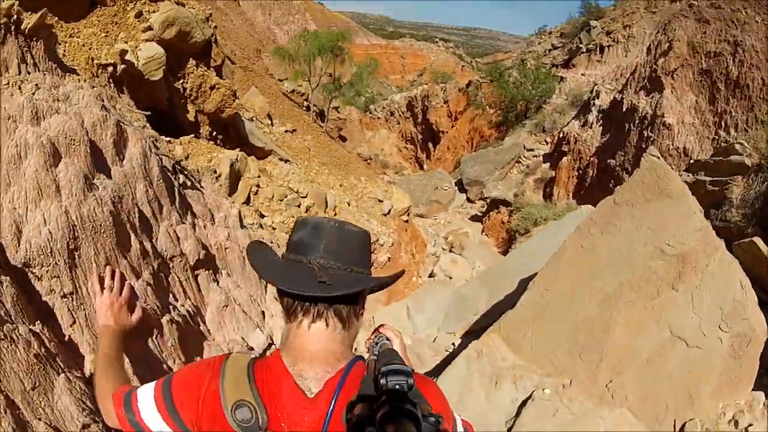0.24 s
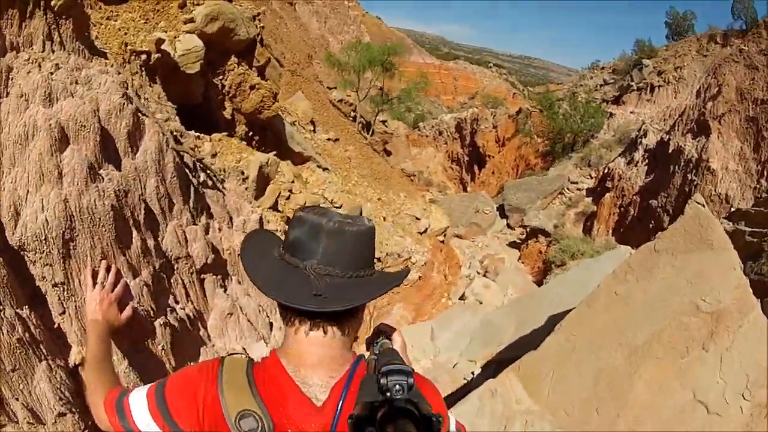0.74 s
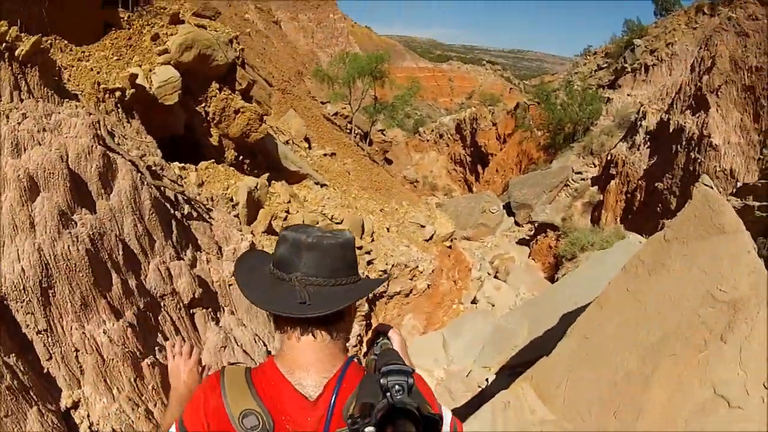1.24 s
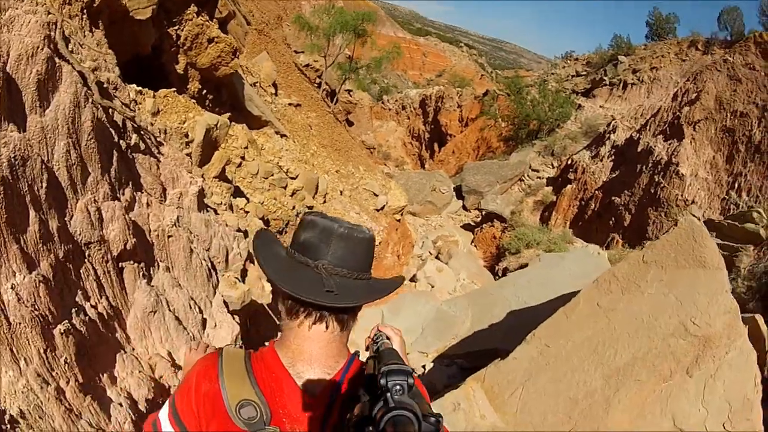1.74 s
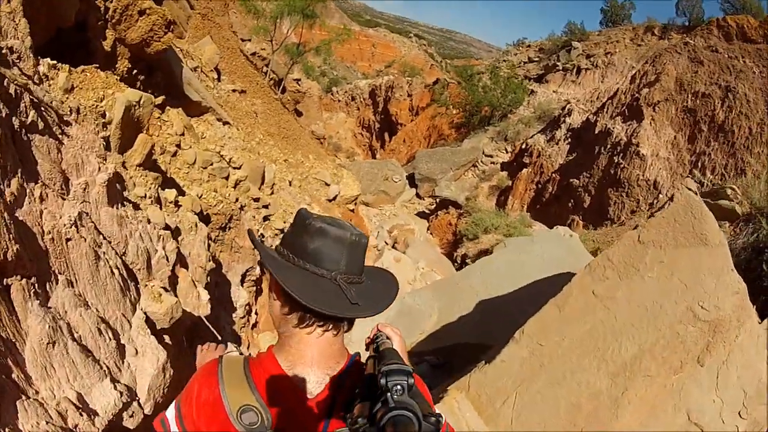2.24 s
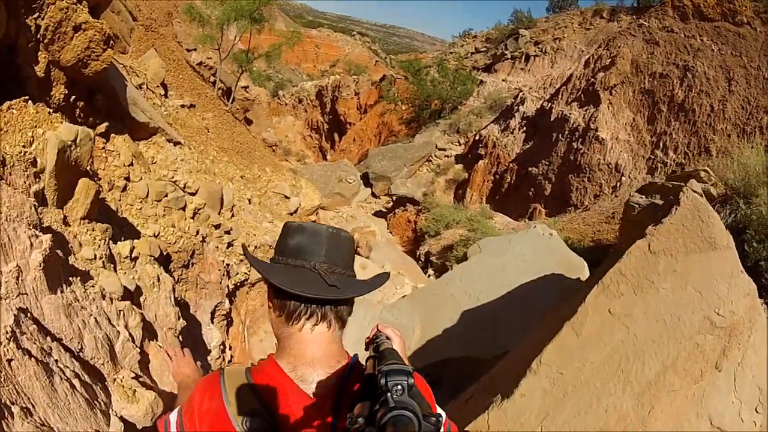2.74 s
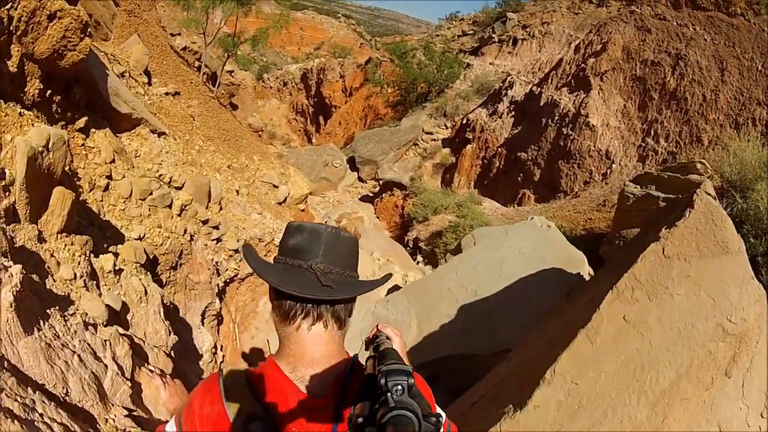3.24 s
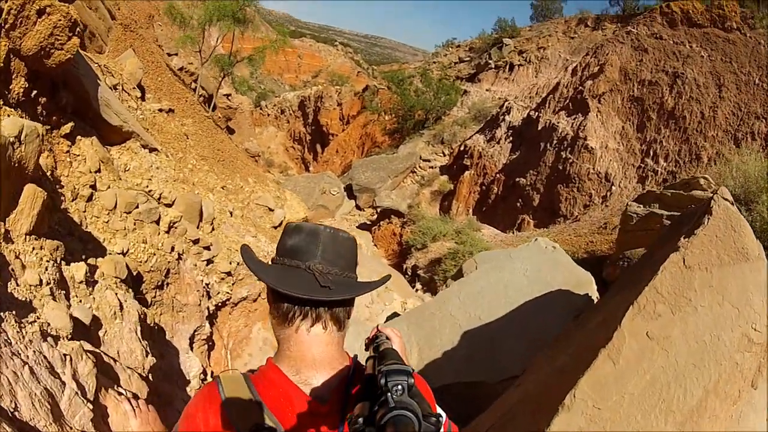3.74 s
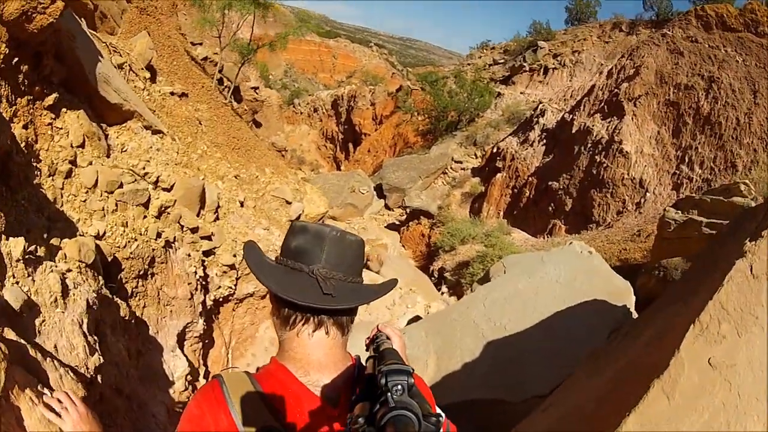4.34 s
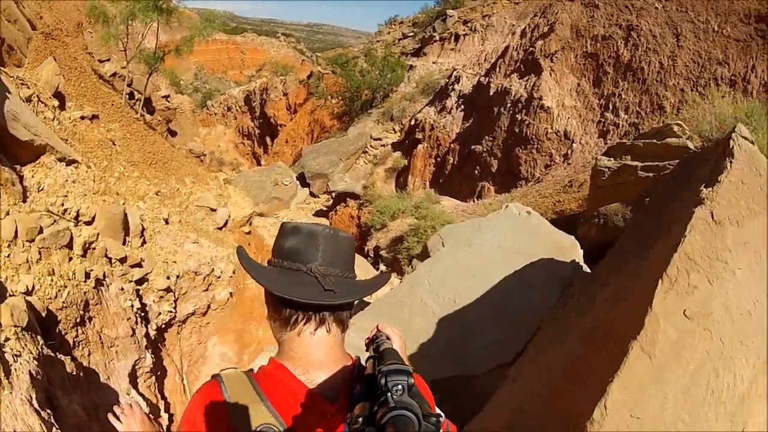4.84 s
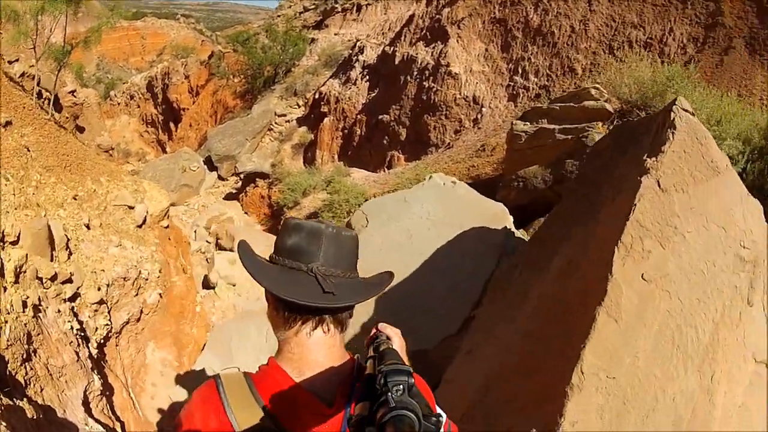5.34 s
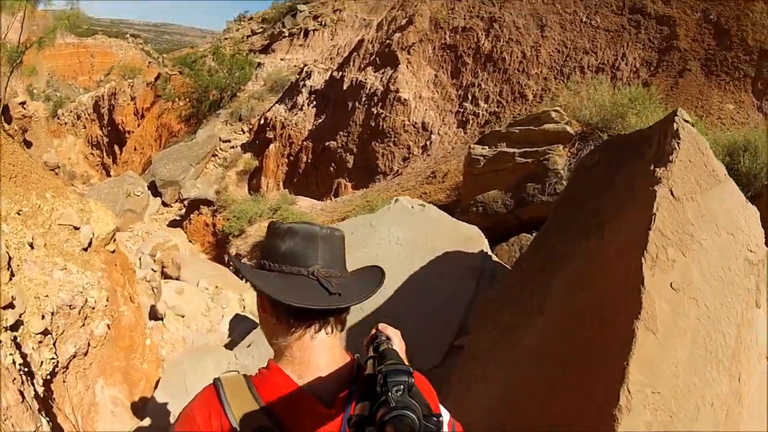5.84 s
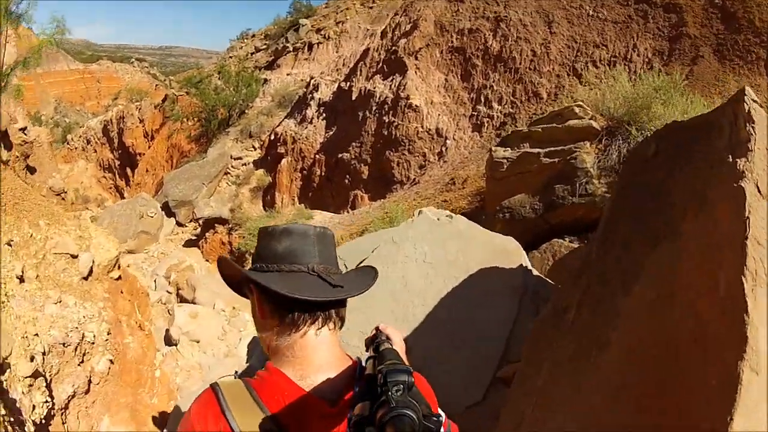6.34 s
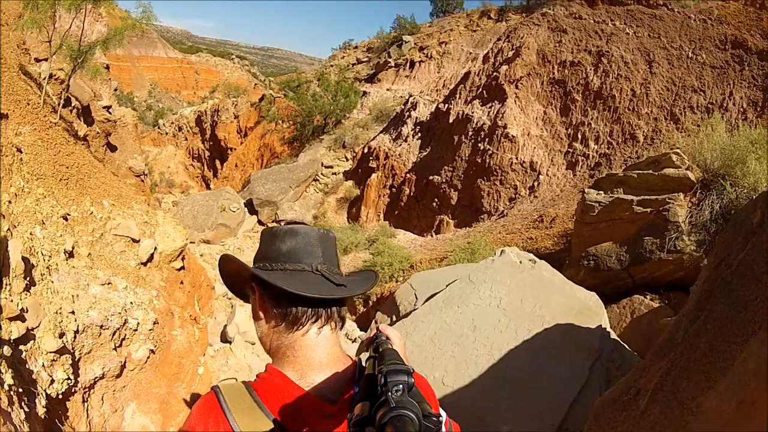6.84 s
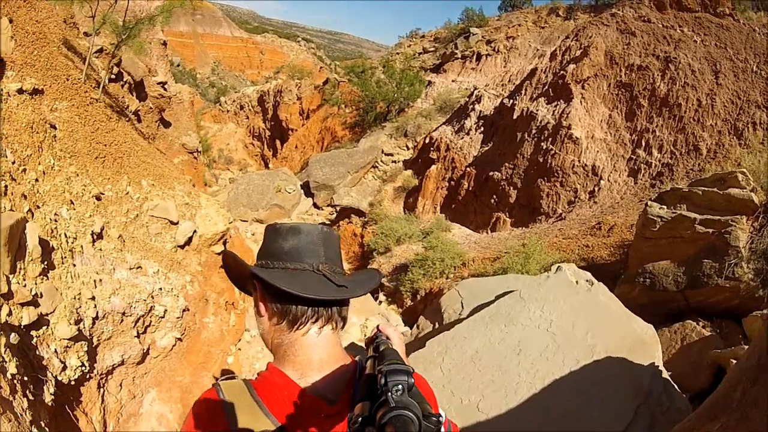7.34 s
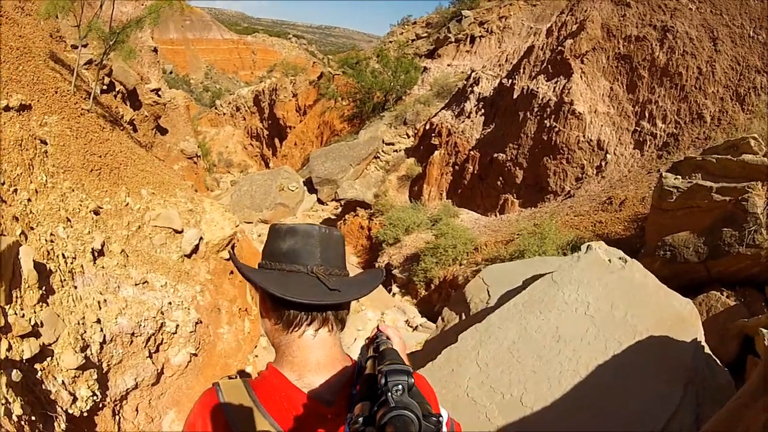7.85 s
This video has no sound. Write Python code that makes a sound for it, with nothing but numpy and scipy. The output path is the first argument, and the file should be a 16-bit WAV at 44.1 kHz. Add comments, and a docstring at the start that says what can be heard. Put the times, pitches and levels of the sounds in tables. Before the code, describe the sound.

A small camera housing on a hiker's pack picks up close, boxy handling noise on a rocky descent. From 0 to 0.8 seconds there are soft thuds, faint knocks and cloth-like strap rubs, with a short groan around 0.55. Between 1.0 and 1.25 heavy low jolts pile up with the strongest scraping, another brief groan and thin fizz. Hollow clacks cluster at 1.6 to 1.7, 1.95 and 2.25 to 2.4, then it quiets until about 3.4. Thumps and knocks return at 3.7 to 4.4, strongest near 4.05. After a lull, clacks resume at 5.1; the loudest, sharp raps strike at 5.87 and 6.0, with low thumps and rattling to 6.5. Duller knocks follow near 6.9, then a clatter at 7.3 to 7.65 and a last knock at 8.0. A low, shaking rumble, faint air hush and glassy coarse sheen run throughout.

```python
"""Gear knocks and clacks on a small camera mounted on a hiker's pack, on the way down a rocky canyon.
Knocks ring the housing's modes; jolts of the body thump and set the mount swinging on its bending modes.
Straps rub as dense little slips into those modes, with narrow-band groans.
Separately, short bursts of thin, high fizz are heard, made of band-passed noise.
Under it lie a low rumble of the shaken pack and a faint hush, both filtered noise.
All of it passes through a coarse recorder that adds a glassy sheen."""
import sys
import numpy as np
from scipy import signal
from scipy.fft import rfft, irfft
from scipy.io import wavfile

SR = 44100
rng = np.random.default_rng(int(sys.argv[2]) if len(sys.argv) > 2 else 0)


def bounce(signal):
    """Save signal as a 16-bit WAV file at the path given by the first command-line argument."""
    frames = np.transpose(np.atleast_2d(signal))
    limited = np.clip(frames, -1, 1)
    pcm = np.round(limited * 32767).astype(np.int16)
    wavfile.write(sys.argv[1], SR, pcm)


N = 356769
TIME = np.arange(N) / SR

# gear knocking on the mount: (time [s], clack near 1 kHz [dB], weight = low thud over the clack [dB],
# brightness = highs over the clack [dB], spot struck [about -1 to 1])
GEAR_KNOCKS = [(0.175, -61.5, 15, -18, 0.2), (0.2112, -58.5, -14, -4, -0.52),
               (0.2771, -53.5, 2, -22, -0.75), (0.732, -50.5, 13, -17.5, 0.39), (0.8044, -59, 1.5, 2, .1),
               (0.8693, -56, 10, -17, 0.46), (0.9413, -53, 15.5, -22, 0.59), (1.2172, -58, 9, -21, 0.59),
               (1.6066, -44.5, -8, -6, 0.36), (1.6559, -43.5, -1.5, -9.5, -0.53),
               (1.6878, -43.5, 0, -6.5, -1.03), (1.8185, -61, 18.5, -8, 0.22),
               (1.9365, -42.5, -0.5, -6, -.4), (2.2543, -52, -12, -7.5, 0.5),
               (2.3218, -47.5, -11, -2.5, -.6), (2.3693, -50, -22, 0.5, -0.86),
               (2.3906, -53.5, -16, -1, -0.65), (2.508, -66, 16.5, -9, 1), (2.6225, -55.5, 4, -11, 0.33),
               (2.7095, -61.5, 1, -12, 0.61), (2.928, -62.5, 1, -4, -0.61), (3.255, -61, -8, -11, -0.047),
               (3.417, -61, -8, -22, -0.078), (3.452, -51, 14.5, -5, 1), (3.7313, -57.5, 17, -14, 1),
               (3.7637, -49, 10.5, -9.5, 0.8), (3.886, -63.5, -16, -0.5, -.1),
               (3.944, -47, -5, -5.5, -0.64), (4.0209, -43, 8, -4.5, 1), (4.1848, -46.5, -4.5, -17, -0.11),
               (4.273, -48.5, -8, -6, -1.1), (4.2932, -53.5, -4, -4, -0.57), (4.3407, -49, -13, -4, -0.31),
               (4.4448, -55.5, -15, -3.5, 0.032), (4.816, -63, -13, -2, 0), (5.06, -57.5, 6, -21, .7),
               (5.0899, -49, 10, -6, .8), (5.1157, -42.5, -3.5, -4, -0.23), (5.2969, -61.5, -15, -3, -0.29),
               (5.4283, -56, 3, -14, 0.031), (5.4761, -47.5, -7, -20, -0.47),
               (5.647, -52.5, 12, -12.5, 0.97), (5.8695, -32, -14.5, -8, -0.31),
               (5.9994, -51.5, 12, -0.5, -0.93), (6.0071, -33, -10.5, -8, 0.93), (6.111, -47, 0, -12, .5),
               (6.1555, -51.5, 14, -8, 0.79), (6.1974, -40.5, 4.5, -4, 0.56),
               (6.2812, -59.5, -13, -3.5, -0.21), (6.4194, -46, -11, -18, 0.045),
               (6.4305, -41.5, -5.5, -3.5, -0.95), (6.4613, -47, -2, -13.5, 1), (6.722, -52, -7, 4, -0.74),
               (6.8152, -57.5, 18, -9, 1), (6.8876, -52.5, 9.5, -10, 1), (7.2766, -39.5, 4.5, -3, 0.59),
               (7.453, -48, -3, -3, -.1), (7.4718, -39.5, -9.5, -7.5, -0.88), (7.513, -45.5, -18, -4, -1.1),
               (7.5404, -48.5, -1, -3.5, -.5), (7.5619, -53, 1.5, -2.5, -0.74),
               (7.592, -47.5, 1, -5.5, -.9), (7.64, -44, -6.5, -8, -.9), (8.0133, -41.5, 1, -5, 1),
               (8.066, -65, 22.5, -3, 0.58)]
# jolts of the body and pack: (time of the crest [s], peak level [dB], swing [Hz])
BODY_JOLTS = [(0.141, -47.5, 102), (0.222, -37, 64.4), (0.313, -39, 64.5), (0.582, -43, 72.5),
              (1.002, -34, 85), (1.06, -32, 48), (1.152, -31, 78), (1.203, -29.5, 55.7),
              (1.24, -32.5, 54.3), (1.565, -47, 63.4), (1.618, -42, 61.6), (1.832, -36, 73),
              (1.977, -40.5, 55), (2.022, -38, 41.4), (2.155, -49, 47.6), (2.406, -48, 44.6),
              (2.527, -49.5, 82), (3.462, -41.5, 79), (3.562, -45, 91.6), (3.759, -43, 75),
              (3.816, -41, 68), (4.048, -37.5, 74), (4.087, -29.5, 59.5), (4.15, -41, 56.3),
              (4.212, -39, 59), (5.114, -54.5, 98), (5.692, -46, 81), (5.997, -35, 68), (6.042, -33, 74.5),
              (6.192, -38, 59.6), (6.892, -40.5, 72), (7.282, -44, 80), (7.97, -49, 41), (8.019, -49.5, 97)]
# strokes of straps and cloth over the mount: (start [s], length [s], level [dB], brightness [dB])
STRAP_STROKES = [(0.0, 0.065, -59.5, -11), (0.201, 0.036, -53.5, -9.5), (0.27, 0.21, -62, -14),
                 (0.398, 0.13, -56.5, -16), (0.534, 0.11, -55, -16), (0.972, 0.042, -44, -6.5),
                 (1.035, 0.088, -46, -1.5), (1.136, 0.059, -51, -16), (1.364, 0.31, -75, -12),
                 (1.74, 0.043, -70, -28), (1.958, 0.084, -53, -13), (2.28, 0.14, -64.5, -13),
                 (2.511, 0.03, -60, -20), (2.727, .1, -60, -19), (3.507, 0.087, -62.5, -28),
                 (4.045, .015, -45, -11), (4.099, 0.049, -48.5, -14), (4.253, 0.0079, -49, -11),
                 (5.176, 0.048, -73.5, -10), (5.79, 0.08, -68.5, -16), (6.04, 0.038, -50.5, -13.5),
                 (6.114, .11, -61, -26), (7.326, 0.049, -60, -20), (7.576, .06, -74, -20)]
# a taut strap drags and the housing groans: (time of the crest [s], half length [s], level [dB])
STRAP_GROANS = [(0.552, 0.094, -56.5), (1.097, 0.036, -41)]
# short bursts of thin, high fizz: (time [s], length [s], level before a common 3.5 dB lift [dB])
FIZZ_BURSTS = [(0.344, 0.0054, -61), (0.418, 0.0091, -68.5), (0.765, 0.016, -71), (1.001, 0.012, -56),
               (1.09, 0.017, -63), (1.176, 0.003, -53.5), (1.188, 0.015, -58.5), (1.957, 0.012, -61.5),
               (2.042, 0.012, -67), (2.733, 0.0057, -69.5), (4.105, 0.014, -58), (4.174, 0.0082, -59),
               (4.242, 0.017, -66), (5.614, 0.012, -67.5), (6.068, 0.02, -59.5), (6.135, 0.0078, -60.5)]
# modes of housing and mount: (frequency [Hz], relative level [dB], T60 [s], change when struck at spot 1 [dB])
HOUSING_MODES = [(125.6, -5, 0.13, 1.5), (281.1, -3.5, .18, 0), (352.7, -3.5, 0.095, -3),
                 (474, -6, 0.03, 5.5), (564, -5.5, 0.05, 6.5), (623, -9.5, 0.11, 0.5),
                 (680, -7, 0.082, -4.5), (767, -1.5, 0.043, -8.5), (952, -2.5, 0.063, -1),
                 (992, -1.5, 0.05, 1), (1132.7, -6.5, 0.077, 1), (1579, 3, 0.034, 6.5),
                 (1668, 0.5, 0.026, 5), (1790, -17.5, 0.11, 4.5), (1966, -7.5, 0.042, 2),
                 (2137, 7.5, 0.017, -2), (2443, -4.5, 0.032, -1.5), (3145, -5, 0.017, 0),
                 (3230, -3.5, 0.022, 2.5), (3635, -6.5, 0.025, -3)]
# edges between the low, hollow, clack and bright modes: (frequency [Hz])
REGISTER_EDGES = [430, 860, 1330]
# slow bending of the mount: (frequency [Hz], relative level [dB], T60 [s])
BENDING_MODES = [(44.4, -2, 0.52), (69.24, 0.5, 0.45), (99, -8.5, 0.66)]
# force spectrum of the sliding contact: (frequency [Hz], relative level [dB])
FRICTION_FORCE = [(130, -19), (280, 4), (450, 0), (617, 7), (740, -2), (1100, -3.5), (1560, 5),
                  (1733, -1.5), (2200, -2), (3500, 4)]
# spectrum of the steady background: (frequency [Hz], relative level per Hz [dB])
HUSH_SPECTRUM = [(10, -48), (22, -4.5), (65, 3), (130, -6), (250, -7), (400, -13), (650, -22.5),
                 (1000, -26), (2000, -28), (3500, -32.5), (5700, -33.5)]

# faint ticks of loose gear between the knocks
TICKS_PER_S, TICK_DB, TICK_WEIGHT_DB, TICK_BRIGHT_DB = 2.0, -69.5, 4.5, -12.5
# heavy, hard blows also bring out the hollow middle modes: offset, then dB per dB of weight and brightness
HOLLOW_DB, HOLLOW_PER_WEIGHT, HOLLOW_PER_BRIGHT = 4.5, 0.42, 0.13
SHAKE_BUILD_S, SHAKE_SETTLE_S = 0.11, 0.13   # the pack starts to move before each jolt and settles after it
STROKE_ATTACK_S, STROKE_RELEASE_S = 0.014, 0.017   # a strap takes hold and lets go
CREEP_DB, CREEP_BRIGHT_DB = -79.5, -23.5   # straps creep: level at mean shaking, brightness
CREEP_FOLLOWS = 0.38   # share of the shaking's swing in dB that the creep follows
TREMBLE_DB, RESTING_TREMBLE_DB = -27.5, -69   # trembling of the mount: relative to the shaking, and at rest
HEAVE_DB, HEAVE_HZ, HEAVE_T60_S = -24.5, 30, 0.27   # the whole pack heaves; level relative to the shaking
HUSH_DB, HUSH_WAVER_DB = -67, 0.7
RECORDER_RATE_HZ, CUTOFF_HZ = 12000, 15600


def from_db(db):
    """Turn decibels into gain."""
    return 10 ** (np.asarray(db) / 20)


def rms_one(x):
    """Scale to unit rms."""
    return x / np.sqrt(np.mean(x ** 2) + 1e-20)


def at_hz(points, hz):
    """Read a spectrum on a log-frequency axis."""
    f, db = np.transpose(points)
    return np.interp(np.log(np.maximum(hz, 1)), np.log(f), db)


def band(x, low_hz, high_hz, order=2):
    """Causal band-pass."""
    sos = signal.butter(order, [low_hz, high_hz], "band", fs=SR, output="sos")
    return signal.sosfilt(sos, x)


def decay(t, t60):
    """Exponential ring-down that loses 60 dB in t60 seconds."""
    return np.exp(-np.log(1000) * t / t60)


def resonate(x, hz, t60):
    """One damped resonance with gain 1 at its peak."""
    r = decay(1 / SR, t60)
    feed = np.array([1, 0, -1]) * (1 - r * r) / 2
    return signal.lfilter(feed, [1, -2 * r * np.cos(2 * np.pi * hz / SR), r * r], x)


def flutter(per_s):
    """Smooth random wander of unit rms; its spectrum is down to half amplitude at per_s Hz."""
    f = np.arange(N // 2 + 1) * SR / N
    return rms_one(irfft(rfft(rng.standard_normal(N)) / (1 + (f / per_s) ** 2), N))


def envelope(start_s, length_s, attack_s, release_s):
    """Exponential swell, hold, exponential fade."""
    rise = (TIME - start_s) / attack_s
    fall = (start_s + length_s - TIME) / release_s
    return np.exp(np.clip(np.minimum(rise, fall), -20, 0))


def add(out, s, sound):
    """Mix a sound in at time s."""
    i = int(np.clip(s * SR, 0, N - 1))
    out[i:i + len(sound)] += sound[:N - i]


def knocks(blows, build_cycles=1.0, contact_s=0.002, lag_1khz_s=0.004118, scatter_rad=1.0, spread_db=2.0,
           detune=0.017, crack_db=-4.5, crack_s=0.0034, buzz_db=-10.0, buzz_t60=0.14):
    """Each knock rings the housing; soft contacts favour the low modes, hard ones the high, and the spot picks."""
    out, t = np.zeros(N), np.arange(SR // 3) / SR
    hz, mode_db, t60, spot_db = np.transpose(HOUSING_MODES)[:, :, None]
    register = np.searchsorted(REGISTER_EDGES, hz)
    build = 1 - np.exp(-t * hz / build_cycles)
    shapes = from_db(mode_db) * decay(t, t60) * build
    seating = 1 - np.exp(-(t / contact_s) ** 2)   # the parts graze before they seat
    # as in bending waves, low modes lag longer; only their phase is shifted
    lag = lag_1khz_s * np.sqrt(1000 / hz)
    for s, clack_db, weight_db, bright_db, spot in blows:
        hollow_db = HOLLOW_DB + HOLLOW_PER_WEIGHT * weight_db + HOLLOW_PER_BRIGHT * bright_db
        # no two contacts are quite alike
        strength, loading, scatter = rng.standard_normal((3, len(hz), 1))
        register_db = np.array([weight_db, hollow_db, 0, bright_db])[register]
        strength_db = register_db + spot * spot_db + spread_db * strength
        phase = 2 * np.pi * hz * (1 + detune * loading) * (t - lag) + scatter_rad * scatter
        ring = np.sum(from_db(strength_db) * shapes * np.sin(phase), axis=0)
        crack_noise, buzz_noise = rng.standard_normal((2, len(t)))
        crack = rms_one(band(crack_noise, 1470, 3960, order=5)) * np.exp(-t / crack_s)
        # loose parts keep buzzing faintly
        buzz = rms_one(band(buzz_noise, 200, 690)) * decay(t, buzz_t60)
        blow = ring + from_db(crack_db + bright_db) * crack + from_db(buzz_db + hollow_db / 2) * buzz
        add(out, s, from_db(clack_db) * seating * blow)
    return out


def ticks(shake):
    """Random faint touches of loose gear, as rows like the knocks, crowding where the pack shakes harder."""
    chance = np.cumsum(shake)
    rows = []
    for when, spot in rng.random((int(TICKS_PER_S * N / SR), 2)):
        s = np.searchsorted(chance, when * chance[-1]) / SR
        rows.append((s, TICK_DB, TICK_WEIGHT_DB, TICK_BRIGHT_DB, 2 * spot - 1))
    return rows


def jolts(rise_s=0.0071, fall_s=0.0077, after_db=-5.0, lead_s=0.14):
    """The body shoves the mount to and fro; it then swings out on its own bending modes."""
    out, t = np.zeros(N), np.arange(SR // 2) / SR - lead_s
    steepness = np.abs(t) / np.where(t < 0, rise_s, fall_s)
    shove = 1 / np.cosh(np.minimum(steepness, 20))   # swells and dies smoothly
    for s, peak_db, swing_hz in BODY_JOLTS:
        forced = shove * np.cos(2 * np.pi * (swing_hz * t + rng.random()))
        free = sum(from_db(mode_db) * resonate(forced, hz, t60) for hz, mode_db, t60 in BENDING_MODES)
        swing = forced + from_db(after_db) * free / np.abs(free).max()
        add(out, s - lead_s, from_db(peak_db) * swing / np.abs(swing).max())
    return out


def shaking():
    """How hard the pack moves: the energies of all jolts add up."""
    power = 0
    for s, db, _ in BODY_JOLTS:
        power = power + (from_db(db) * envelope(s, 0, SHAKE_BUILD_S, SHAKE_SETTLE_S)) ** 2
    return np.sqrt(power)


def sliding(shake):
    """Strength of the rubbing and of its bright part: the strokes, over a slight creep of the straps."""
    creep = from_db(CREEP_DB) * (shake / shake.mean()) ** CREEP_FOLLOWS
    power, bright_power = creep ** 2, (from_db(CREEP_BRIGHT_DB) * creep) ** 2
    for s, length, db, bright_db in STRAP_STROKES:
        stroke = from_db(db) * envelope(s, length, STROKE_ATTACK_S, STROKE_RELEASE_S)
        power = power + stroke ** 2
        bright_power = bright_power + (from_db(bright_db) * stroke) ** 2
    return np.sqrt(power), np.sqrt(bright_power)


def rubbing(shake, grit_db=-5.0, drag_db=-10.0, slips_per_s=1600, slip_spread_db=5.0, smooth_share=0.43,
            uneven_db=1.63):
    """Dense little slips drive the housing's modes; each stroke's brightness sets the high modes and dry grit."""
    press, bright_press = sliding(shake)
    happens = rng.random(N) < slips_per_s / SR
    slips = happens * from_db(slip_spread_db * rng.standard_normal(N)) * rng.choice([-1, 1], N)
    force = rms_one(slips) + smooth_share * rng.standard_normal(N)
    force = force * from_db(uneven_db * flutter(53))
    body, rasp = np.zeros(N), np.zeros(N)
    for k, (hz, db, t60, _) in enumerate(HOUSING_MODES):
        sign = (-1) ** k   # neighbouring modes oppose each other
        mode = sign * from_db(db + at_hz(FRICTION_FORCE, hz)) * rms_one(resonate(force, hz, t60))
        if hz < REGISTER_EDGES[-1]:
            body += mode
        else:
            rasp += mode
    body = rms_one(band(body, 120, 1250, order=3))
    grit = from_db(grit_db) * rms_one(band(force, 1360, 2600))
    rasp = rms_one(band(rasp, 1250, 4040)) + grit
    drag = from_db(drag_db) * rms_one(band(force, 56, 260))   # the strap also tugs at the whole mount
    return press * (drag + body) + bright_press * rasp


def groans(hz=613, stage_t60=0.05):
    """Stick and slip lock on to one housing mode, drawn as noise through two equal resonances in series."""
    swell = sum(from_db(db) * np.exp(-((TIME - s) / half) ** 2) for s, half, db in STRAP_GROANS)
    once = resonate(rng.standard_normal(N), hz, stage_t60)
    return swell * rms_one(resonate(once, hz, stage_t60))


def fizz(lift_db=3.5, edge_s=0.0046, grain_db=3.0):
    """Short bursts of thin, high fizz: band-passed noise with a fast random flutter."""
    gate = np.zeros(N)
    for s, length, db in FIZZ_BURSTS:
        corners = [s - edge_s, s, s + length, s + length + edge_s]
        gate += from_db(db) * np.interp(TIME, corners, [0, 1, 1, 0])
    grains = rng.standard_normal(N) * from_db(grain_db * flutter(250))
    return from_db(lift_db) * gate * rms_one(band(grains, 3400, 8400))


def rumble(shake):
    """The swaying pack heaves and keeps the mount trembling on its bending modes, most around the jolts."""
    push = rng.standard_normal(N)
    # the trembling modes ring half as long as after a jolt
    tremble = rms_one(sum(from_db(db) * resonate(push, hz, t60 / 2) for hz, db, t60 in BENDING_MODES))
    tremble_level = np.hypot(from_db(RESTING_TREMBLE_DB), from_db(TREMBLE_DB) * shake)
    heave = rms_one(resonate(rng.standard_normal(N), HEAVE_HZ, HEAVE_T60_S))
    return tremble_level * tremble + from_db(HEAVE_DB) * shake * heave


def hush():
    """Faintly stirring canyon air and microphone hiss, as one shaped noise that wavers slowly."""
    f = np.arange(N // 2 + 1) * SR / N
    air = rms_one(irfft(rfft(rng.standard_normal(N)) * from_db(at_hz(HUSH_SPECTRUM, f)), N))
    return from_db(HUSH_DB + HUSH_WAVER_DB * flutter(4.1)) * air


def scene():
    """Everything meets at the one microphone inside the housing."""
    shake = shaking()
    steady = jolts() + rubbing(shake) + groans() + fizz() + rumble(shake) + hush()
    return (steady + knocks(GEAR_KNOCKS) + knocks(ticks(shake)))[None]


def record(dry):
    """Coarse samples held as steps mirror the sound above half the recorder's rate, as a glassy sheen."""
    smooth = signal.sosfiltfilt(signal.butter(16, 5750, fs=SR, output="sos"), dry)
    coarse = signal.resample_poly(smooth, RECORDER_RATE_HZ, SR, axis=-1, window=("kaiser", 2))
    steps = np.repeat(coarse, 4, axis=-1)
    held = signal.resample_poly(steps, SR, 4 * RECORDER_RATE_HZ, axis=-1)[:, :N]
    top_cut = signal.ellip(10, 0.2, 80, CUTOFF_HZ, fs=SR, output="sos")
    return signal.sosfilt(top_cut, held)


dry = scene()
out = record(dry)
bounce(out)
```